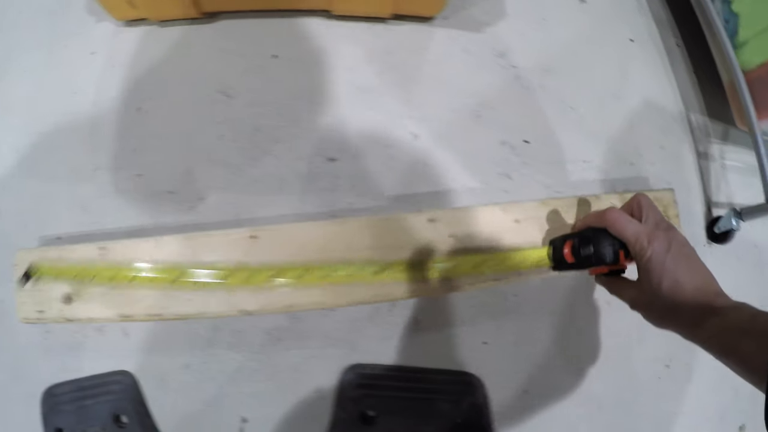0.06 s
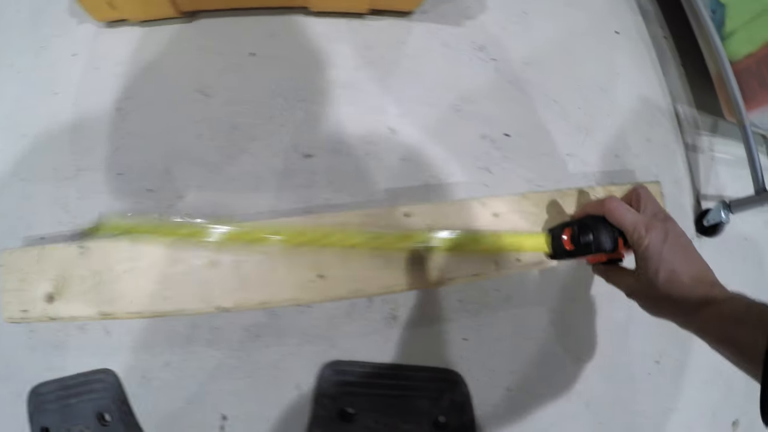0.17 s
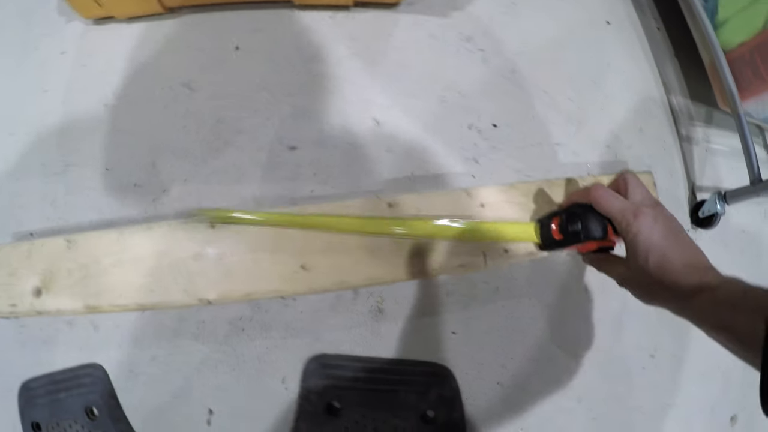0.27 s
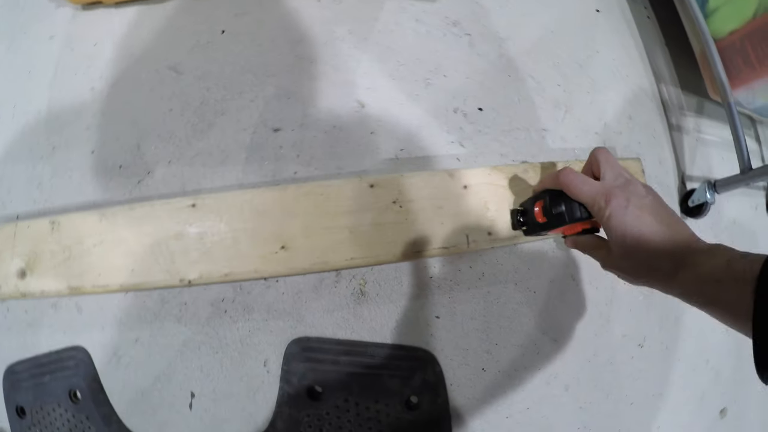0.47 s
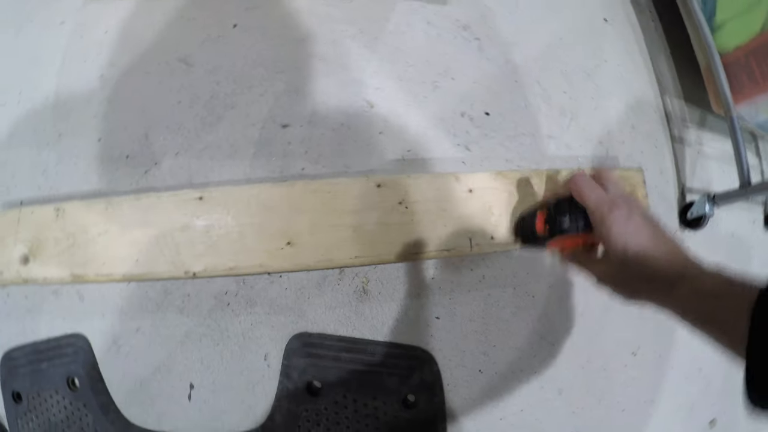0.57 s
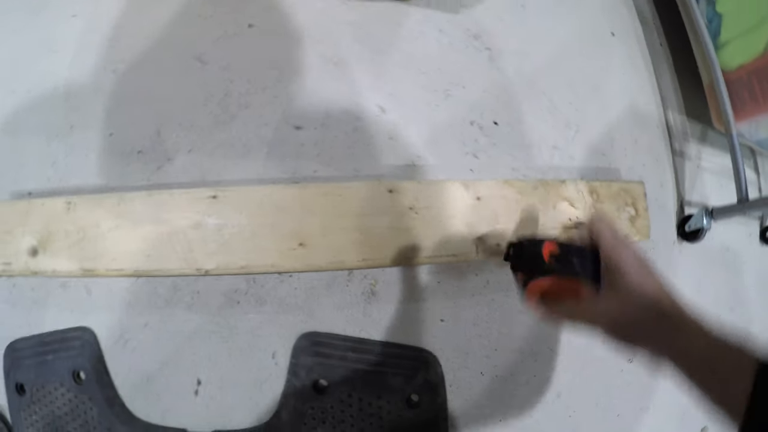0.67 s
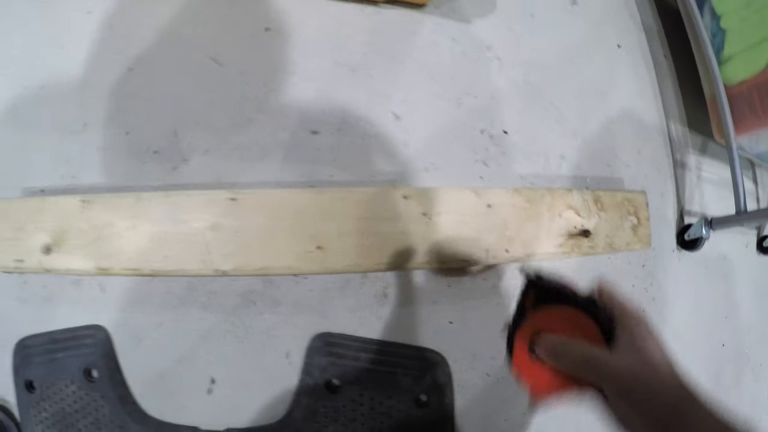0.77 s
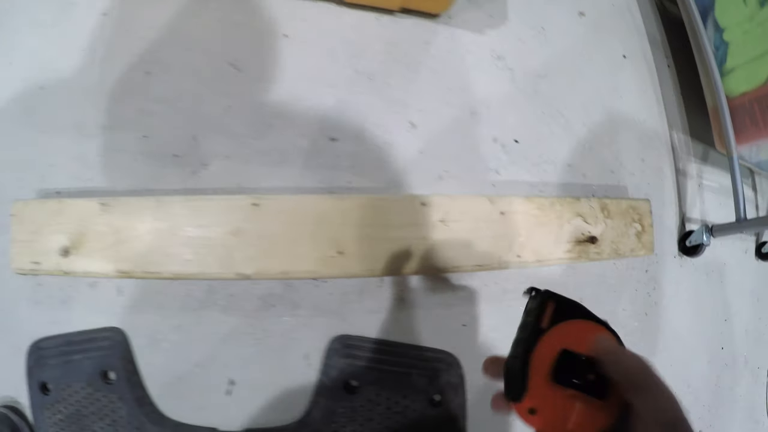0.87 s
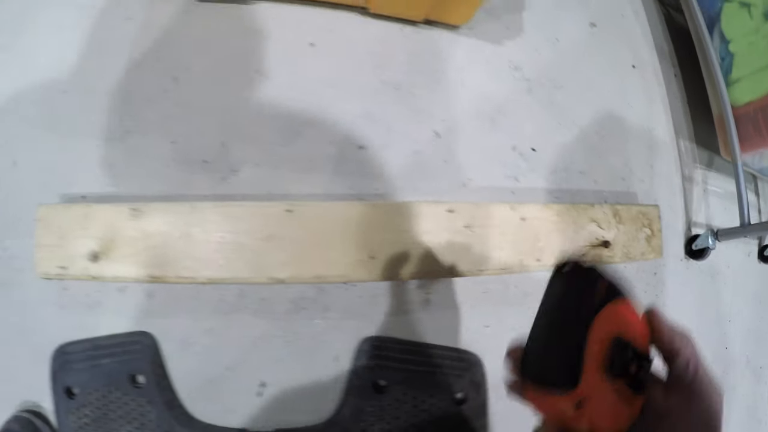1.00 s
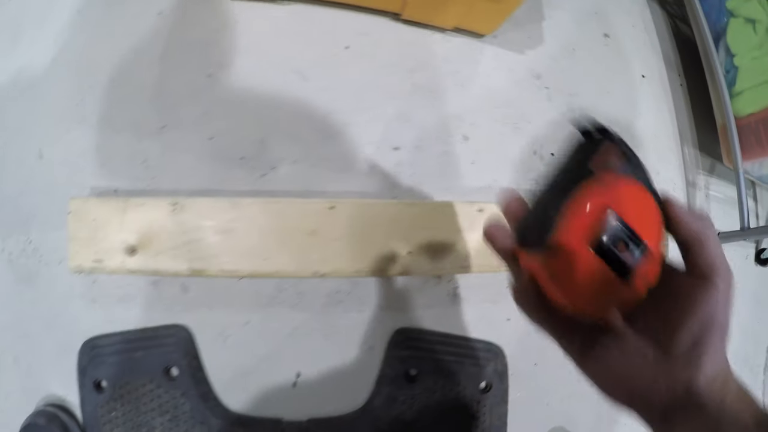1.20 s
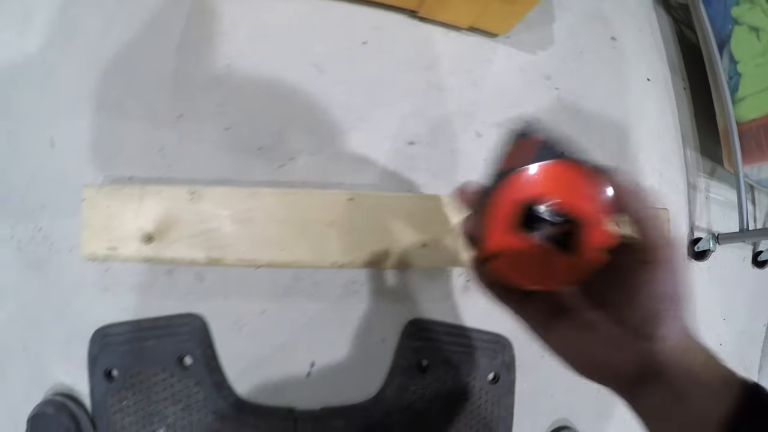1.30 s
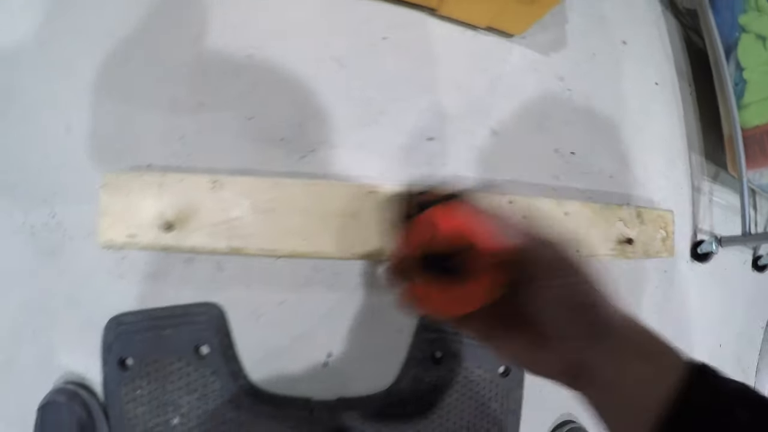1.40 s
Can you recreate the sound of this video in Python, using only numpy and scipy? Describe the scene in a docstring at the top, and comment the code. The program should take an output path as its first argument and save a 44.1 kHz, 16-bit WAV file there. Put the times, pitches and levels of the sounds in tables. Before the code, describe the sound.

Metal tape measure retracts with a quick bright scraping rattle and hard snap, over low room hum.

```python
"""Low rumble and a machine's hum fill a basement while a steel tape measure winds itself in over a board.
The blade is grainy friction noise through its own resonances, with slaps, cracks and gliding notes.
Its hook slams into the case (noise bursts and decaying modes) and the case recoils with a hollow knock.
Scuffs, clicks and soft finger rubs follow as the case is lifted off the board."""
import sys
import numpy as np
from scipy import signal
from scipy.fft import rfft, irfft
from scipy.io import wavfile

SR = 44100
rng = np.random.default_rng(int(sys.argv[2]) if len(sys.argv) > 2 else 0)


def generate_wav(sig):
    """Save sig (samples, or channels by samples) to the path in sys.argv[1] as 16-bit PCM at SR."""
    pcm = np.round(np.clip(np.atleast_2d(sig).T, -1, 1) * 32767).astype(np.int16)
    wavfile.write(sys.argv[1], SR, pcm)


N = 63945
TIME = np.arange(N) / SR
CUTOFF_HZ = 15430  # top of the whole sound
SMOOTH_SHARE = 0.83  # share of the sliding friction's power that is smooth noise, the rest is grains

# resonances of the curved steel blade: freq_hz, peak_db (body() adds 6 dB), t60_s
BLADE_MODES = [(1190, 6.5, 0.05), (1353, 5.5, 0.07), (1689, 3, 0.036), (2080, -2.5, 0.028),
               (2665, -3, 0.029), (3170, -1, 0.054), (5180, -2, 0.049), (6300, -9, 0.05), (6600, -7, .07),
               (7640, -1.5, 0.03)]
# resonances of the plastic case: freq_hz, peak_db (body() adds 6 dB), t60_s
CASE_MODES = [(1157, -2, 0.033), (2680, -5, 0.035), (3160, -2.5, 0.08), (3580, -2, 0.087), (4150, -5, .06),
              (4530, -5, 0.026), (5330, -2, 0.045)]


def amp(db):
    """Decibels to gain."""
    return 10 ** (np.asarray(db) / 20)


def unit(x):
    """Scales to rms 1."""
    return x / np.sqrt(np.mean(x ** 2) + 1e-20)


def read(points, hz):
    """Reads a spectrum table on a log-frequency axis."""
    f, value = np.transpose(points)
    return np.interp(np.log(hz + 1), np.log(f), value)


def level(points):
    """Gain over time from a table of time_s, level_db."""
    return amp(np.interp(TIME, *np.transpose(points)))


def swell(center_s, width_s):
    """Bell-shaped rise and fall around one moment."""
    return np.exp(-.5 * ((TIME - center_s) / width_s) ** 2)


def coloured_noise(spectrum):
    """Steady noise of rms 1 with the colour of a spectrum table."""
    gain = amp(read(spectrum, np.fft.rfftfreq(N, 1 / SR)))
    return unit(irfft(rfft(rng.standard_normal(N)) * gain, N))


def drift(top_hz):
    """Random motion of rms 1 with nothing faster than top_hz."""
    slow = np.fft.rfftfreq(N, 1 / SR) < top_hz
    return unit(irfft(rfft(rng.standard_normal(N)) * slow, N))


def body(spectrum, modes, tilt_db=0, size=8192):
    """Impulse response of energy 1: a broad colour, tilted above 1 kHz, with resonances standing out of it."""
    hz = abs(np.fft.fftfreq(size, 1 / SR))
    peaks = 0
    for f, db, t60 in modes:
        half_width_hz = np.log(1000) / (np.pi * t60)  # a longer ring is a narrower peak
        peaks = peaks + amp(2 * db) / (1 + ((hz - f) / half_width_hz) ** 2)
    octaves = np.log2(np.maximum(hz, 1000) / 1000)
    gain = amp(read(spectrum, hz) + tilt_db * octaves) * np.sqrt(1 + 4 * peaks)
    # minimum phase: the energy arrives as early as this spectrum allows
    minimum_phase = np.exp(np.conj(signal.hilbert(np.log(gain))))
    response = np.fft.ifft(minimum_phase).real[:size // 2]
    return response / np.linalg.norm(response)


def contacts(smooth):
    """Dense tiny contacts of uneven size, mixed with smooth friction."""
    grains_per_s, spread_db = 5000, 3
    sizes = amp(spread_db * np.minimum(rng.exponential(1, N), 4)) * rng.choice([-1, 1], N)
    grains = unit(sizes * (rng.random(N) < grains_per_s / SR))
    smooth = np.clip(smooth, 0, 1)
    return np.sqrt(1 - smooth) * grains + np.sqrt(smooth) * rng.standard_normal(N)


def blows(table, spectrum, modes):
    """Each blow is a short burst of chatter (attack, hold, decay) into a ringing body."""
    attack_s, grain_share = 0.0018, 0.14
    out = np.zeros(N)
    for start, db, hold, t60, tilt_db in table:
        t = TIME - start
        shape = np.clip(t / attack_s, 0, 1) * amp(-60 * np.maximum(t - hold, 0) / t60)
        burst = shape * contacts(1 - grain_share)
        sound = signal.fftconvolve(burst, body(spectrum, modes, tilt_db))[:N]
        out += amp(db) * sound * np.linalg.norm(shape) / np.linalg.norm(sound)
    return out


def snaps(table, spectrum, modes):
    """One clean impact per row, ringing out in the body."""
    out = np.zeros(N)
    for start, db, tilt_db in table:
        ring = body(spectrum, modes, tilt_db)
        part = out[round(start * SR):][:len(ring)]
        part += amp(db) * ring[:len(part)] / abs(ring).max()
    return out


def ringing(start_s, level_db, rise_s, modes):
    """Decaying modes that start together, faded in over the rise."""
    t = np.maximum(TIME - start_s, 0)
    ring = sum(amp(gain_db - 60 * t / t60) * np.sin(2 * np.pi * hz * t) for hz, gain_db, t60 in modes)
    return amp(level_db) * np.minimum(t / rise_s, 1) * ring


def background():
    """Low rumble and a machine's hum rise and fall together; faint air noise has its own level."""
    # colours of rumble and air: freq_hz, density_db (per Hz, relative)
    rumble_colour = [(15, -30.5), (37, -0.5), (60, 2.5), (85, 2), (135, -8.5), (160, -13), (275, -22.5),
                     (350, -37), (700, -65.5)]
    air_colour = [(150, -22), (320, -7), (900, -11.5), (1800, -18.5), (4000, -23), (8000, -29.5),
                  (15000, -39)]
    # loudness over time: time_s, level_db
    rumble_level = [(0, -33.5), (.22, -34), (.55, -41.5), (.70, -39), (.765, -33), (.84, -36.5),
                    (1.14, -32), (1.45, -33.5)]
    air_level = [(0, -49), (.6, -57), (.76, -56), (1.1, -52.5), (1.45, -52)]
    # tones of the machine: freq_hz, level_db (relative to the rumble)
    hum_tones = [(120, -7.5), (183, -18)]
    hum = np.zeros(N)
    for f, db in hum_tones:
        hum += amp(db) * np.sqrt(2) * np.sin(2 * np.pi * (f * TIME + rng.random()))
    rumble = coloured_noise(rumble_colour)
    return (rumble + hum) * level(rumble_level) + coloured_noise(air_colour) * level(air_level)


def basement(x):
    """Quick reflections off floor and board, with a short diffuse tail whose decay depends on frequency."""
    # decay of the tail: freq_hz, t60_s
    room_decay = [(550, 0.36), (1200, 0.24), (3000, 0.22), (7000, 0.26), (15000, 0.31)]
    tail_db, early_db, early_t60_s, gap_s = -19.5, -13.5, 0.056, 0.0025
    reflections_per_s = 2000
    t = TIME[:SR // 2]
    after_gap = t > gap_s

    hz, frame_s, z = signal.stft(rng.standard_normal(len(t)), SR, nperseg=256)
    fading = z * amp(-60 * frame_s / read(room_decay, hz)[:, None])
    tail = signal.istft(fading, SR, nperseg=256)[1][:len(t)] * after_gap

    sparse = rng.standard_normal(len(t)) * (rng.random(len(t)) < reflections_per_s / SR)
    early = sparse * amp(-60 * t / early_t60_s) * after_gap

    room = amp(tail_db) * tail / np.linalg.norm(tail) + amp(early_db) * early / np.linalg.norm(early)
    return x + signal.fftconvolve(x, room)[:N]


def fingers():
    """Soft swells of friction, coloured by the case, as the hand turns it over."""
    # rubs: center_s, level_db, width_s
    rubs = [(0.825, -60.5, 0.0076), (0.923, -59.5, 0.036), (1.044, -60.5, 0.02), (1.267, -53, 0.0076)]
    # colour: freq_hz, density_db (per Hz, relative)
    rub_colour = [(2000, -7), (3750, 1), (6000, -7), (15000, -18)]
    strokes = sum(amp(db) * swell(center, width) for center, db, width in rubs)
    return signal.fftconvolve(strokes * contacts(SMOOTH_SHARE), body(rub_colour, CASE_MODES))[:N]


def lift():
    """The case scuffs the board under shifting fingers, and its latch snaps as it settles."""
    # scuffs and clicks: start_s, level_db, hold_s, t60_s, tilt_db_per_octave
    scuffs = [(.5885, -42.5, 0.0022, 0.025, -1), (.6005, -40.5, 0.0044, 0.032, -4),
              (.605, -36.5, 0.001, .016, 0.5), (.6082, -30.5, 0.005, 0.026, 0.5),
              (.6195, -23.5, 0.00091, 0.012, -2), (.628, -45, 0.0012, 0.18, -0.5)]
    # snaps of the latch: start_s, peak_db, tilt_db_per_octave
    latch_snaps = [(.6087, -32, 6), (.6199, -12.5, -1), (.6283, -21.5, -4.5)]
    # colour: freq_hz, density_db (per Hz, relative)
    click_colour = [(200, -20), (700, -15), (1200, -15.5), (2800, -2.5), (3900, -3), (5200, -6),
                    (6200, -8.5), (8800, -11.5), (10500, -16), (15500, -21.5)]
    return blows(scuffs, click_colour, CASE_MODES) + snaps(latch_snaps, click_colour, CASE_MODES)


def recoil():
    """The case jolts dully against hand and board, and the spool knocks inside its hollow shell."""
    # thuds: start_s, level_db, hold_s, t60_s, tilt_db_per_octave
    thuds = [(.466, -20, 0.0054, 0.029, 5), (.472, -26.5, 0.0012, 0.07, -3), (.493, -27, 0.0034, 0.092, 3),
             (.6272, -36, 0.00069, 0.02, -16)]
    # colour: freq_hz, density_db (per Hz, relative)
    thud_colour = [(60, -4), (190, 2), (400, -10.5), (680, -3), (880, -12), (1100, -6.5), (1950, -3.5),
                   (2500, -14), (15000, -47)]
    # modes of the spool's knock: freq_hz, gain_db, t60_s
    hollow_modes = [(626, -24, 0.19), (738, -11, 0.051), (1088, 2.5, 0.024), (1148, -0.5, 0.038),
                    (1269, -11.5, 0.097), (1664, -12, 0.062)]
    knock = ringing(start_s=.4903, level_db=-10.5, rise_s=.0035, modes=hollow_modes)
    return blows(thuds, thud_colour, CASE_MODES) + knock


def hook_stop():
    """The hook strikes the case in bursts; its last blow adds a thump of the case and a ring of steel."""
    # strikes: start_s, level_db, hold_s, t60_s, tilt_db_per_octave
    strikes = [(.4422, -19, 0.0026, 0.037, -2.5), (.4463, -5, 0.0026, 0.022, -0.4),
               (.4525, -17.5, 0.0018, .025, 2), (.459, -24.5, 0.002, 0.023, -5.5),
               (.4652, -17.5, 0.002, 0.019, -3), (.4671, -9.5, 0.0017, .03, 6)]
    # colour: freq_hz, density_db (per Hz, relative)
    strike_colour = [(150, -37.5), (450, -27), (1100, -17), (2400, -9.5), (3300, -2), (4300, 2.5),
                     (8000, -7), (9800, -14.5), (15500, -23)]
    # thump and ring of the last blow: freq_hz, gain_db, t60_s
    hook_modes = [(192, -13.5, 0.049), (2854, -2.5, 0.041), (3220, 1.5, 0.047)]
    last_blow = ringing(start_s=.4668, level_db=-11.5, rise_s=.004, modes=hook_modes)
    return blows(strikes, strike_colour, CASE_MODES) + last_blow


def boom():
    """A soft low boom of slowly rising modes under the sliding blade."""
    # modes: freq_hz, gain_db, t60_s
    boom_modes = [(76, 0.5, 0.077), (132, -3, 0.063)]
    return ringing(start_s=.152, level_db=-12.5, rise_s=.021, modes=boom_modes)


def whip():
    """A bend in the blade zips down in pitch and up again."""
    lowest_s, lowest_hz, octave_s = .363, 1300, .0031  # one octave up at octave_s either side
    level_db, width_s, lead_s = -18, .0018, .0016  # loudest just before the lowest note
    hz = np.minimum(lowest_hz * (1 + ((TIME - lowest_s) / octave_s) ** 2), CUTOFF_HZ)
    tone = np.sqrt(2) * np.sin(2 * np.pi * (np.cumsum(hz) / SR + rng.random()))
    return amp(level_db) * swell(lowest_s - lead_s, width_s) * tone


def singing():
    """Friction makes one blade note after another sing briefly: each swells, wavers and fades, most glide."""
    # notes: center_s, width_s, pitch_hz, level_db, glide_hz_per_s
    notes = [(.135, 0.026, 1690, -41, -1200), (.235, 0.0063, 1690, -34, 0),
             (.27, 0.022, 2572, -34.5, -1100), (.318, 0.01, 1271, -33, 1202.5)]
    waver_hz, waver_top_hz = 15, 95  # depth, fastest motion
    out = np.zeros(N)
    for center, width, hz, db, glide in notes:
        pitch = hz + glide * (TIME - center) + waver_hz * drift(waver_top_hz)
        tone = np.sqrt(2) * np.sin(2 * np.pi * np.cumsum(pitch) / SR)
        out += amp(db) * swell(center, width) * tone
    return out


def blade_slaps():
    """The blade slaps the board and the mouth of the case, and cracks sharply as it buckles."""
    # slaps: start_s, level_db, hold_s, t60_s, tilt_db_per_octave
    slap_hits = [(.0745, -28, 0.011, .04, 1.5), (.1765, -20, 0.0057, 0.014, -0.5),
                 (.2248, -14.5, 0.011, 0.032, -0.5), (.2515, -25, .0025, .02, 2.5),
                 (.2772, -12, 0.0024, 0.016, 11.5), (.276, -24, 0.0088, .03, -8.5),
                 (.305, -26.5, 0.0049, 0.02, -2), (.3605, -15.5, 0.005, 0.035, -2.5),
                 (.387, -19.5, 0.0047, 0.021, -3), (.4074, -15.5, 0.016, 0.029, -0.5),
                 (.414, -13, 0.0053, 0.028, -2)]
    # cracks: start_s, peak_db, tilt_db_per_octave
    cracks = [(.1088, -11, -1.5), (.1388, -12, 2.5), (.232, -4.5, -2), (.3608, -6, -7.5)]
    # colour: freq_hz, density_db (per Hz, relative)
    slap_colour = [(150, -30.5), (600, -30), (950, -29.5), (1250, -15.5), (2500, -8.5), (5200, 1),
                   (7400, 2), (9500, -4), (12500, -6.5), (15500, -19.5)]
    return blows(slap_hits, slap_colour, BLADE_MODES) + snaps(cracks, slap_colour, BLADE_MODES)


def scrape():
    """The spool starts to turn, then the fluttering blade slides and rattles over the wood until it is all in."""
    # loudness of the run: time_s, level_db
    run_level = [(0, -41), (.058, -40), (.075, -35.5), (.19, -24), (.218, -33), (.24, -21), (.30, -20.5),
                 (.342, -25.5), (.362, -18.5), (.38, -21), (.425, -20), (.465, -42.5)]
    # colour of the sliding blade: freq_hz, density_db (per Hz, relative)
    scrape_colour = [(150, -29.5), (450, -15.5), (1250, -14.5), (2300, -10), (6300, 3), (8200, -3.5),
                     (12500, -9.5), (15500, -14)]
    slide_start_s, run_end_s = .063, .474
    flutter_db, flutter_top_hz = 2, 159
    rattles_per_s, rattle_db = 220, -8.5
    spool_top_hz = 8400  # before the blade slides only the duller spool is heard

    rattle_sizes = rng.choice([-1, 1], N) * rng.uniform(.5, 1, N)
    rattles = unit(rattle_sizes * (rng.random(N) < rattles_per_s / SR))
    friction = contacts(SMOOTH_SHARE) * unit(amp(flutter_db * drift(flutter_top_hz)))
    spool = signal.sosfilt(signal.butter(2, spool_top_hz, fs=SR, output="sos"), friction)
    slide = unit(friction + amp(rattle_db) * rattles)
    rub = np.where(TIME < slide_start_s, spool, slide) * level(run_level) * (TIME < run_end_s)
    return signal.fftconvolve(rub, body(scrape_colour, BLADE_MODES))[:N]


def scene():
    """Blade, hook and case sound in the room; the boom and the background are added without it."""
    blade = scrape() + singing() + whip() + blade_slaps()
    case = hook_stop() + recoil() + lift() + fingers()
    return (basement(blade + case) + boom() + background())[None]


def record(dry):
    """Full-scale clipping, then the band limit."""
    band_limit = signal.firwin(401, CUTOFF_HZ, window=("kaiser", 9), fs=SR)
    return signal.oaconvolve(np.clip(dry, -1, 1), band_limit[None], "same")


dry = scene()
out = record(dry)
generate_wav(out)
```